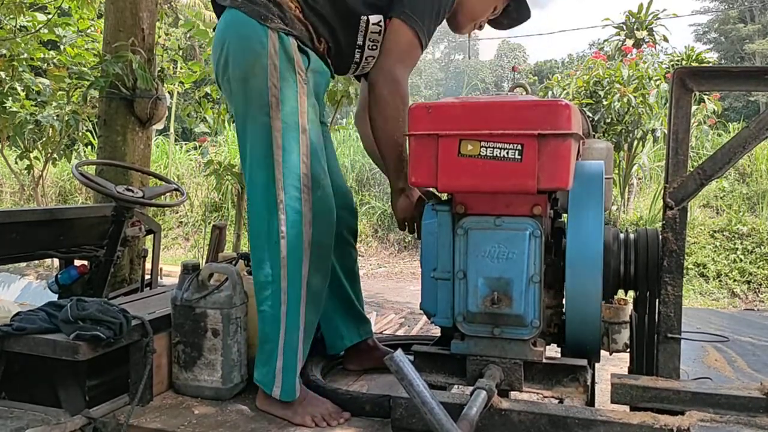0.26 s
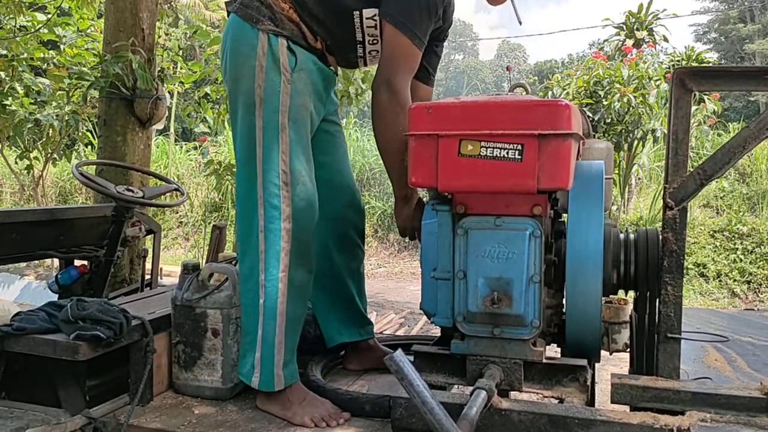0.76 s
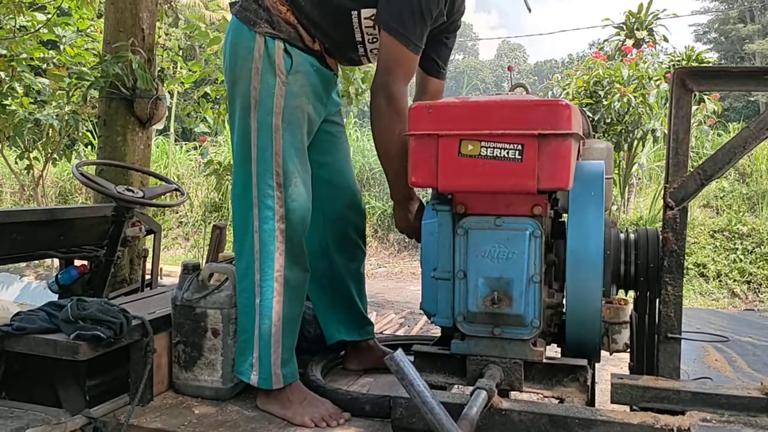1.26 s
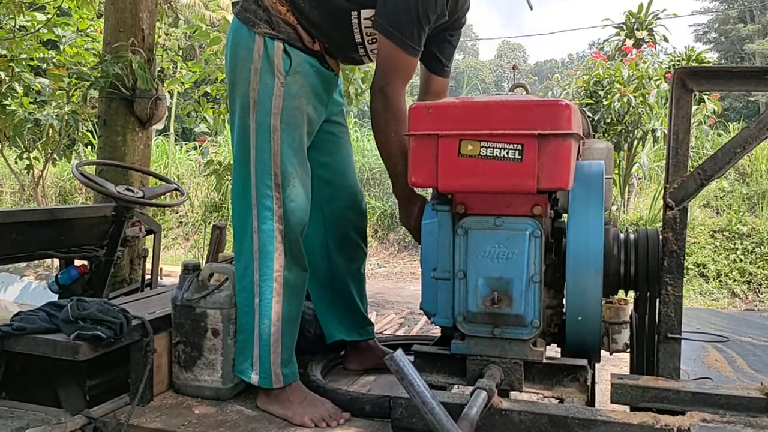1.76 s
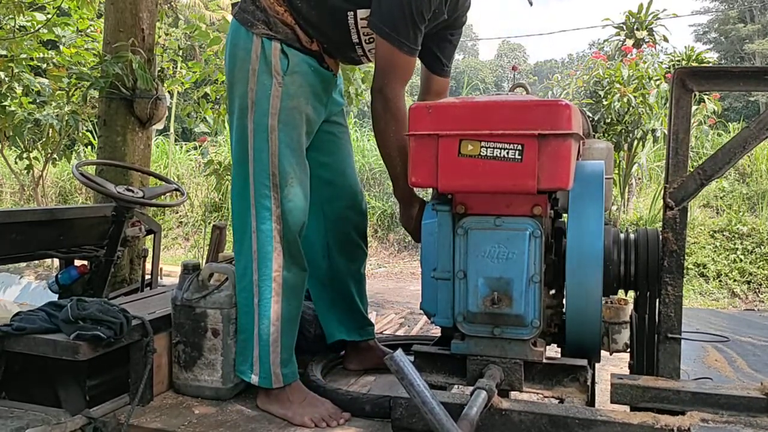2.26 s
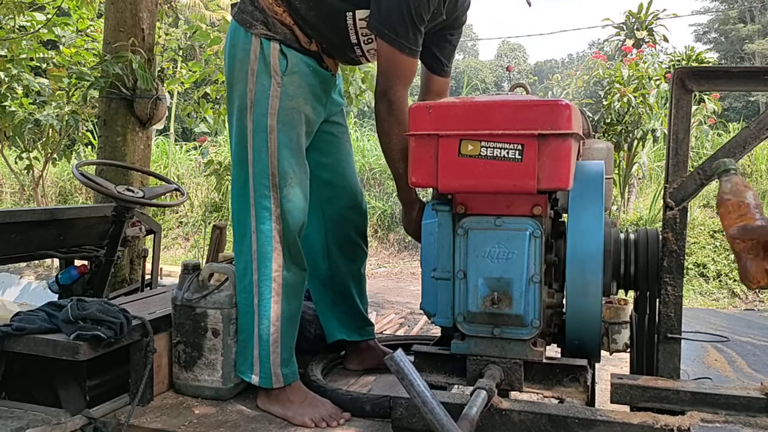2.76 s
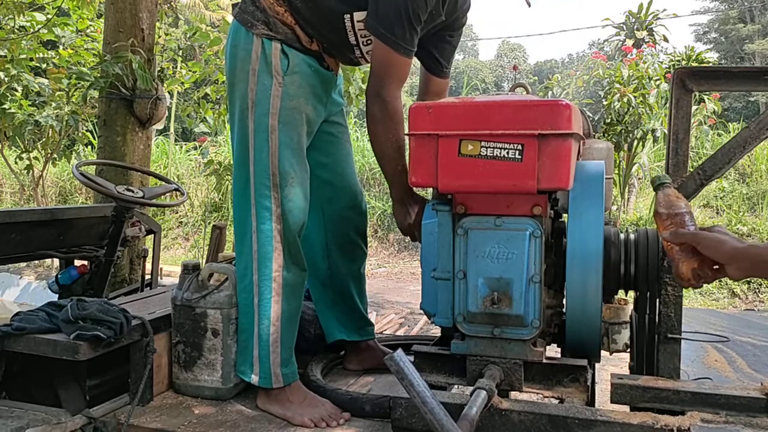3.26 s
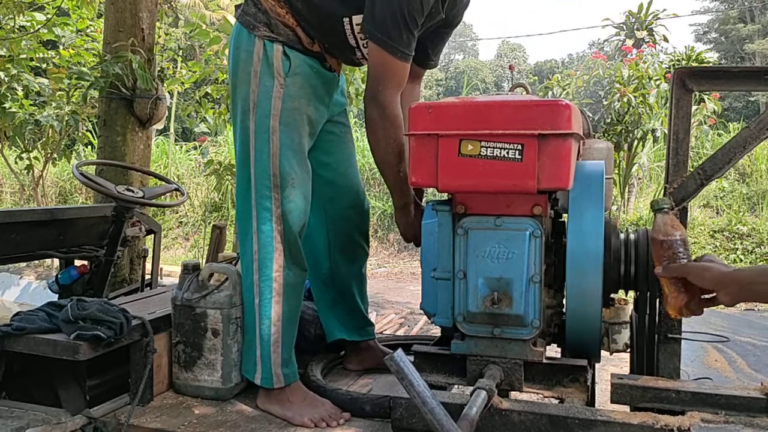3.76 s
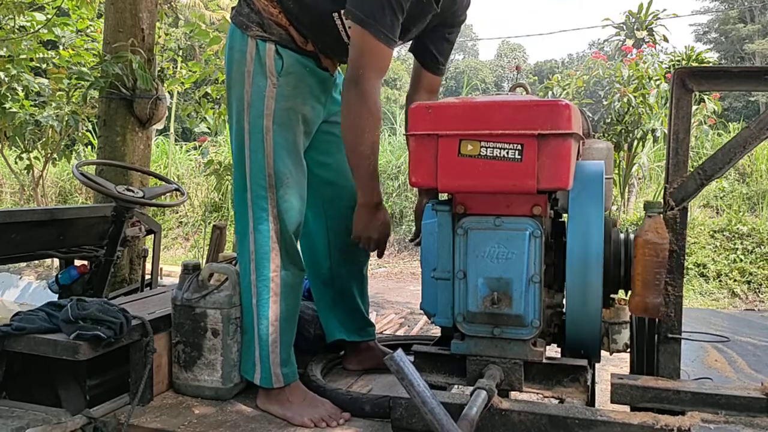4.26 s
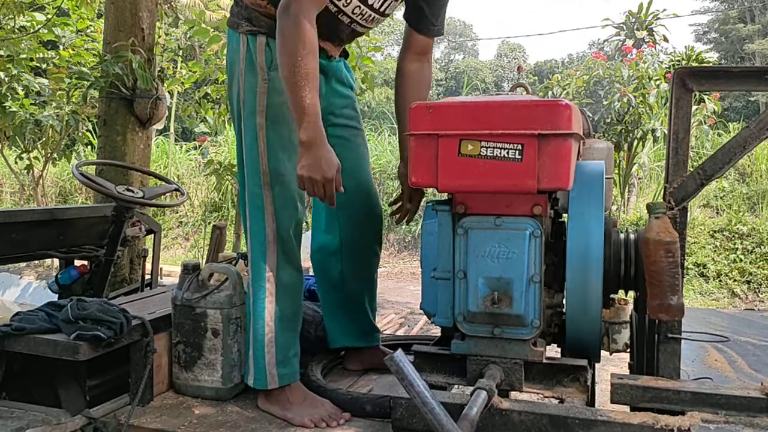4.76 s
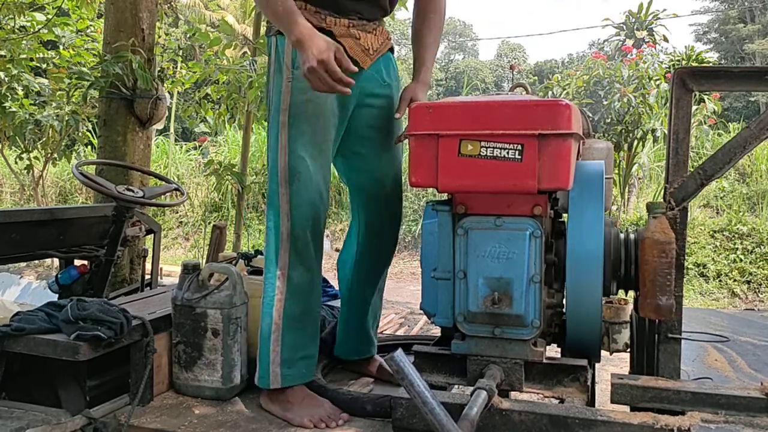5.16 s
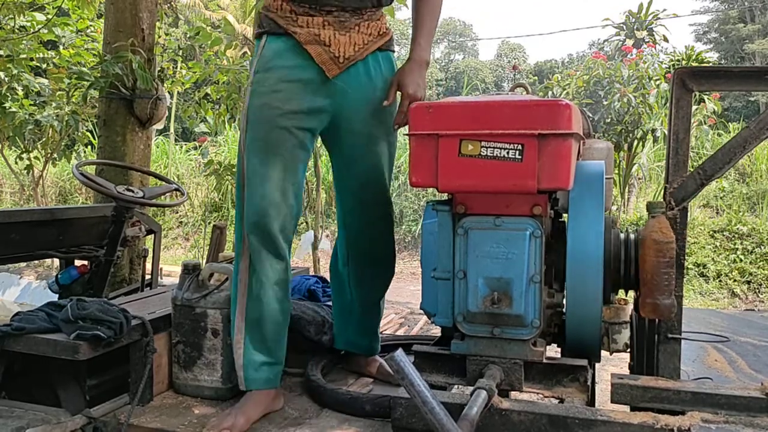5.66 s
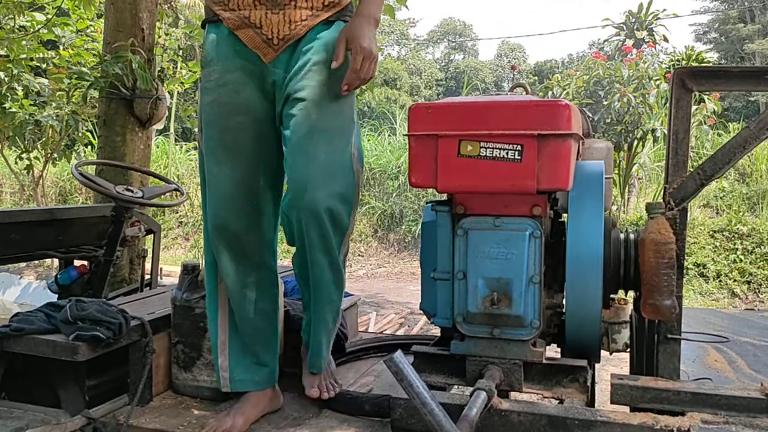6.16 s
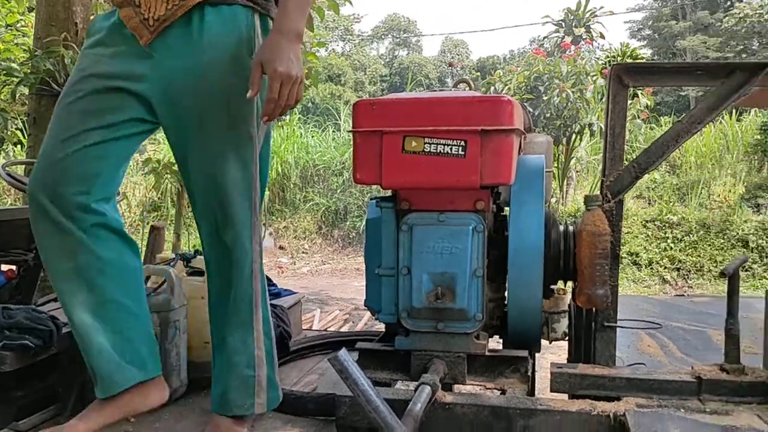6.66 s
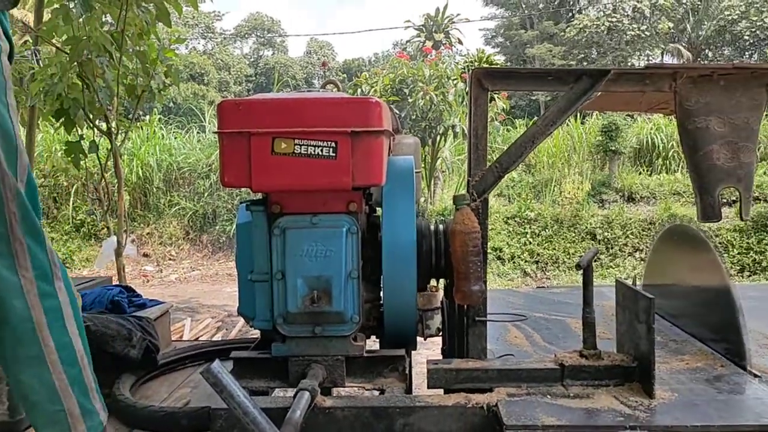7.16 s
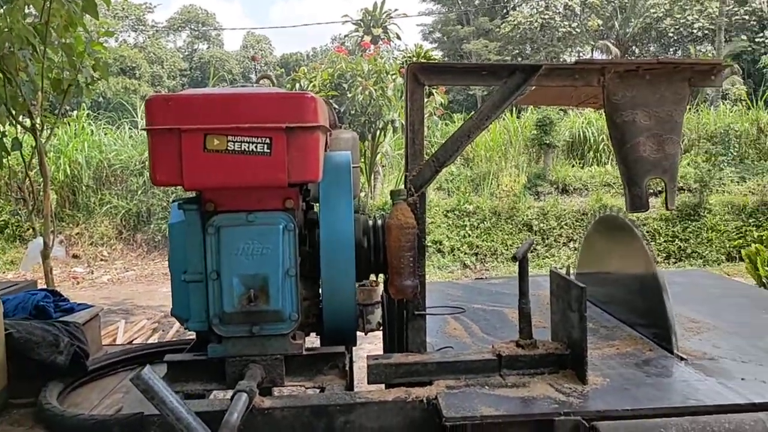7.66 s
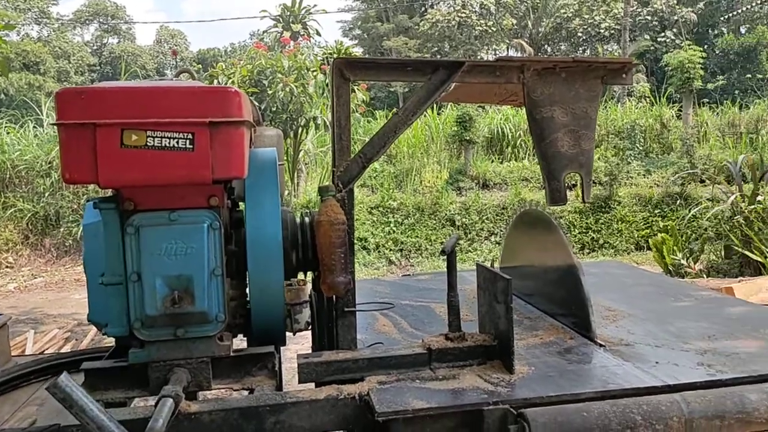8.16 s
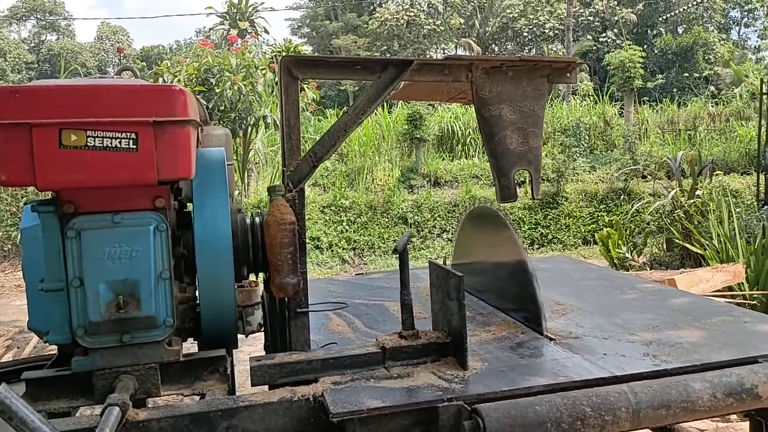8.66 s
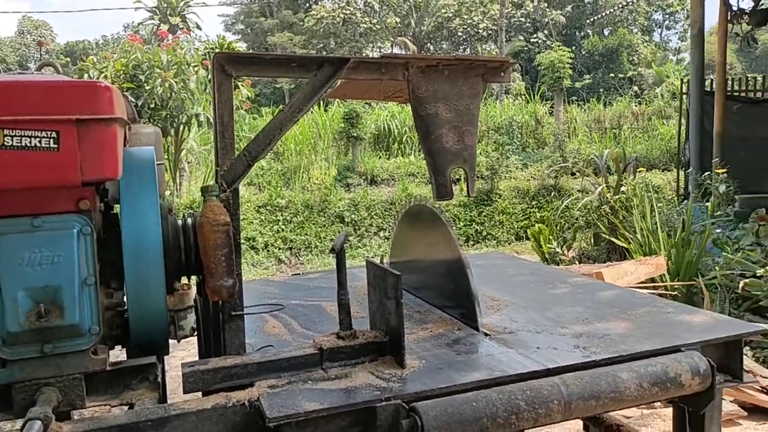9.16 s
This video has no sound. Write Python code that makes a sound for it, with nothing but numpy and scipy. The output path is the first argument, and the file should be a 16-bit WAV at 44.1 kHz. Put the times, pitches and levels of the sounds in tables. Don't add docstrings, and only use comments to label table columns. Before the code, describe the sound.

Outdoors and close, with little reverberation, a single-cylinder diesel is already running at about eleven firings per second. Low, short exhaust thumps carry hard metallic knocks that grow stronger from 0.3 s and peak near 1 s as the throttle opens. Between 1 and 1.7 s the beat quickens to nearly fourteen per second, with a brief whip of belt hiss; knocking softens around 1.6 to 2 s, then exhaust thumps fuller from 2.2 s. The rest is a steady rapid chug at about fourteen, with occasional harder knocks. Throughout, loose sheet metal buzzes brightly around 3 to 5 kHz, swelling irregularly, leaning right, over ticking valves and wide gear and belt clatter. From about 6.7 s the stereo microphone turns: rattle duller and drifting left, thin hum and clatter stronger. After 8.2 s the bass thins slightly; the engine continues to the end at 9.4 s.

```python
import sys
import numpy as np
from scipy import signal
from scipy.fft import dct
from scipy.io import wavfile
from scipy.ndimage import uniform_filter1d, map_coordinates

SR = 44100
rng = np.random.default_rng(int(sys.argv[2]) if len(sys.argv) > 2 else 0)


def to_wav(s):
    ch = np.atleast_2d(s).T
    pcm = np.round(np.clip(ch, -1, 1) * 32767)
    wavfile.write(sys.argv[1], SR, pcm.astype(np.int16))


def level_to_linear(level):
    exponent = np.asarray(level, float) / 20
    return 10 ** exponent


N = 414981

# t/s, speed/(cycles per s)
SPEED = [(-0.1, 11.458), (0.5, 11.381), (0.95, 11.517), (1.1, 12.24), (1.25, 13.018), (1.45, 13.359),
         (1.7, 13.66), (2.1, 13.672), (2.7, 13.762), (3.4, 13.93), (4.1, 13.959), (4.9, 14.03),
         (5.7, 14.055), (6.5, 14.053), (7.4, 14.06), (8.3, 14.038), (9.6, 14.046)]
# t/s, exhaust level/dB, knock level/dB
EFFORT = [(0, -26, -50), (.45, -30, -50), (.8, -25.5, -50), (.97, -31.5, -50), (1.3, -37, -50),
          (1.55, -30.5, -40), (1.85, -31, -42), (2.12, -30.5, -33), (2.27, -27, -21), (3.1, -27, -23),
          (4.1, -25.5, -22), (5.5, -27, -22), (7.0, -30, -25), (7.7, -28.5, -40), (8.1, -25.5, -25),
          (9.41, -26.5, -35)]
VALVE_PULSES = [
    (-0.003, 1.002),
    (0.261, 0.776),
    (0.686, -0.231),
    (0.888, -0.083),
    (0.424, -0.106),
    (0.118, 0.132),
]
# f/Hz, height/1, t60/s
PIPE_MODES = [(27.8, 0.003, 0.16), (71.0, 0.0019, 0.16), (94.4, -0.0021, 0.16), (112.7, -0.0005, 0.16),
              (322.9, -0.0076, 0.03), (352.2, 0.0041, 0.088), (178.1, 0.0048, 0.04),
              (176.0, -0.0025, 0.151), (230.1, -0.0067, 0.054), (409.0, 0.0007, 0.062),
              (469.9, 0.0005, 0.16), (583.3, -0.002, 0.056), (607.9, 0.0021, 0.073), (930.8, 0.0015, 0.023)]
# delay/s, relative pressure/1
REFLECTIONS = [(0.0084, -0.3225), (0.0075, 0.4533), (0.0218, -0.1101)]
# f/Hz, level/dB, t60/s
BLOCK_MODES = [(745, -0.5, 0.064), (791, -1, 0.083), (891, -2, 0.13), (917, 9.5, 0.05), (990, -12, 0.023),
               (1080, -16, 0.024), (1210, -9.5, 0.06), (1770, 1, 0.15), (1960, 0, 0.037),
               (2170, 3.5, 0.038), (2423, 11, 0.012), (2666, 5, 0.032)]
# t/s, peak level/dB, upper-mode level/dB
HARD_KNOCKS = [(0.168, -15, -16), (0.255, -32, -6), (0.343, -14.5, -11), (0.431, -19, -12),
               (0.517, -14.5, -15), (0.606, -13, -14), (0.693, -12.5, -8), (0.781, -11, -13),
               (0.868, -10.5, -7), (0.955, -4.5, -9.5), (1.04, -7, -11), (1.122, -7, -17),
               (1.202, -8.5, -5.5), (1.279, -8.5, -10), (1.355, -10.5, -5), (1.431, -11, -10),
               (1.505, -10.5, -8), (1.579, -15, -25), (1.652, -17, -17), (1.725, -17, -21),
               (1.946, -20, -19), (2.165, -15, -11), (2.238, -13, -14), (2.383, -12.5, -18),
               (2.53, -21, -16), (2.675, -13.5, -11), (2.82, -16, -15), (3.109, -13, -17),
               (3.182, -14, -11), (3.326, -19, -15), (3.756, -17, -4), (4.041, -16, -12),
               (4.329, -15.5, -7), (5.54, -22, -6), (5.969, -13, -13), (7.107, -11.5, -20),
               (7.889, -19, -10), (8.673, -12.5, -16), (9.1, -18.5, -11), (9.171, -20, -10),
               (9.313, -22, -13)]
# delay/s, level/dB
PISTON_SLAPS = [
    (.0025, -3),
    (.0051, -3.5),
    (.0088, -7),
]
# share of cycle/1, level/dB
SEATINGS = [(.002, -30), (.07, -20.5), (.17, -29), (.28, -29), (.51, -27), (.55, -26.5), (.68, -28),
            (.76, -33.5), (0.879, -30.5)]
# f/Hz, level/dB, t60/s
COVER_MODES = [(995, -0.5, 0.016), (1205, -3, 0.033), (1496, -8, 0.011), (1880, 3.5, 0.0083),
               (2330, -1.5, 0.004), (2690, -1, 0.0059)]
# f/Hz, width/Hz, level/dB
SHEET_MODES = [(3119, 28, -2.5), (3342, 24, 3), (3497, 34, 5.5), (3650, 85, 0), (3760, 40, -1),
               (3856, 55, 6), (3920, 40, 0.5), (4060, 60, 4.5), (4220, 70, 7.5), (4383, 40, 6.5),
               (4480, 66, 3), (4620, 67, 4), (4800, 55, 3), (6150, 500, -17)]
# middle t/s, length/s, rise/dB
SHEET_SWELLS = [(.05, 0.041, 3.5), (.3, 0.64, 4), (.52, 0.059, 2.5), (.9, 0.51, 4), (1.4, 1, 0.5),
                (1.84, 0.49, 6), (2.25, 0.36, 1.5), (2.55, 0.57, 2.5), (2.95, 0.61, 3.5), (3.38, 0.16, 0.5),
                (3.8, 0.083, 3.5), (4.45, 1, 2), (4.9, 0.26, 4.5), (5.13, 0.15, 3), (5.32, 0.33, 1),
                (5.48, 0.14, 1), (5.63, 0.16, 1.5), (5.78, 0.1, 5.5), (6.25, 1, 2), (6.74, 0.11, 5.5),
                (6.96, .3, 4), (7.17, 0.22, 4.5), (7.49, 0.34, 2), (7.72, 0.13, 3), (8.14, 0.082, 7.5),
                (8.25, 0.11, 4), (8.36, 0.12, 5), (8.46, 0.17, 4.5), (8.68, 0.66, 3.5), (9.36, 0.54, 1.5)]
# f/Hz, density level/dB
CLATTER_COLOUR = [(40, -7.5), (150, 6.5), (330, -3), (470, -1), (700, 0.5), (900, 0.5), (2600, 1),
                  (4500, -4.5), (5300, -12), (6500, -15), (8400, -21.5), (10500, -19.5), (13000, -34),
                  (15500, -31)]
# f/Hz, likeness/1
LIKENESS = [(60, 1), (130, 0.99), (290, 1), (640, 0.79), (1410, 0.053), (3100, 0.022), (15000, 0.053)]
STROKES = [
    (0.139, 2.3),
    (.27, 0.28),
    (.47, 0.2),
    (0.642, 0.43),
    (.955, 3.4),
]
# middle t/s, length/s, rise/dB
BELT_WHIPS = [
    (.1, 0.42, 2),
    (1.15, 0.55, 6),
    (1.8, 0.25, 2),
    (4.75, 0.2, 2),
    (7.1, 0.29, -0.5),
    (8.3, 0.96, 2),
    (9.15, 0.31, 0.5),
]
# t/s, share of turn/1
MIC_TURN = [
    (0, 0.038),
    (6.65, 0.055),
    (6.95, 0.23),
    (7.6, 0.4),
    (8.3, 0.7),
    (9.1, 0.78),
    (9.41, 0.87),
]
# f/Hz, threshold against local level/dB
PATCH_THRESHOLD = [(300, -34), (1000, -21), (1600, -18), (3900, -24), (4600, -22), (5100, -4), (6300, -4),
                   (7600, -.5), (9000, 1.5), (10300, 0), (12000, 2.5), (15000, 3)]

CYCLES_AT_START, KNOCK_SHARE = -.4437, .446
THUMP_DB, THUMP_FOLLOWS, IDLE_THUMP_DB = -35.5, 0.4, -3.5
PUFF_DB, PUFF_HZ = -5, 59
HUM_DB, HUM_TURN_DB, IDLE_HUM_DB = -45.5, 8.5, -6
RATTLE_DB, RATTLE_WANDER_DB, SHEET_DULLS_DB_PER_OCTAVE = -28.5, 0.23, 9
CLATTER_DB, CLATTER_TURN_DB, TOP_TURN_DB = -29, 3.5, -1.5
SHEET_LAG_S, ENGINE_LAG_S = 0.0003, .00007
SHEET_PAN_DB, PAN_SWING_DB = -2.5, 6.5
SHEET_ECHO_S, SHEET_ECHO_DB = .0031, -10
WIND_FILTER_S = 8.19


def rms_one(x):
    return x / np.sqrt(np.mean(x ** 2) + 1e-20)


def in_time(rows):
    s, *columns = np.transpose(rows)
    return [np.interp(np.arange(N) / SR, s, c) for c in columns]


def at_hz(points, hz):
    f, value = np.array(points)[:, :2].T
    return np.interp(np.log(hz), np.log(f), value)


def swells(rows):
    t = np.arange(0, N + 32, 32) / SR
    bumps = 0
    for middle_s, length_s, rise in rows:
        phase = np.pi * np.clip((t - middle_s) / max(length_s, .02), -.5, .5)
        bumps = bumps + rise * np.cos(phase) ** 2
    return np.interp(np.arange(N) / SR, t, bumps)


def drift(rate_hz):
    r = np.exp(-80 * np.pi * rate_hz / SR)
    noise = rng.standard_normal(N // 40 + 2002)
    slow = signal.lfilter([1], [1, -2 * r, r * r], noise)[2000:]
    return np.interp(np.arange(N) / 40, np.arange(len(slow)), rms_one(slow))


def ring(clicks, hz, t60_s):
    r, w = level_to_linear(-60 / (t60_s * SR)), 2 * np.pi * hz / SR
    return signal.lfilter([0, np.sin(w)], [1, -2 * r * np.cos(w), r * r], clicks + 1e-18)


def resonate(x, hz, width_hz):
    r, w = np.exp(-np.pi * width_hz / SR), 2 * np.pi * hz / SR
    return signal.lfilter(np.array([1, 0, -1]) * (1 - r * r) / 2, [1, -2 * r * np.cos(w), r * r], x)


def resonate_twice(x, hz, width_hz):
    return resonate(resonate(x, hz, width_hz), hz, width_hz)


def butter(x, order, hz, kind="low"):
    return signal.sosfilt(signal.butter(order, hz, kind, fs=SR, output="sos"), x)


def delayed(x, lag_s):
    return np.pad(x, (round(lag_s * SR), 0))[:N]


def each_cycle(share, spread_db):
    cycles = CYCLES_AT_START + np.cumsum(in_time(SPEED)[0]) / SR - share
    at = np.flatnonzero(np.diff(np.floor(cycles)))
    clicks = np.zeros(N)
    clicks[at] = level_to_linear(rng.normal(0, 1, len(at)) * spread_db)
    return clicks


def mic_pair(x, lag_s, pan_db):
    left = map_coordinates(x, [np.arange(N) - lag_s * SR], order=3, mode="nearest")
    return np.array([left * level_to_linear(pan_db / 2), x * level_to_linear(-pan_db / 2)])


def exhaust(thump_db, bark_db, idle):
    pulses = sum(pressure * each_cycle(share, spread_db=0.4) for share, pressure in VALVE_PULSES)
    pipe = sum(height * ring(pulses, hz, t60_s) for hz, height, t60_s in PIPE_MODES)
    pipe = pipe + sum(pressure * delayed(pipe, lag_s) for lag_s, pressure in REFLECTIONS)
    lows = butter(pipe, 1, 120)
    puff = level_to_linear(PUFF_DB) * (1 - idle) * butter(pipe, 1, PUFF_HZ)
    return level_to_linear(thump_db + 63.0) * (lows + puff) + level_to_linear(bark_db + 55.0) * (pipe - lows)


def knock(knock_db):
    s, peak_db, upper_db = np.transpose(HARD_KNOCKS)
    at = (s * SR).astype(int)
    listed = np.zeros(N)
    listed[at] = 1
    unlisted = uniform_filter1d(listed, size=1501) < 1e-6
    usual = each_cycle(KNOCK_SHARE, spread_db=2.5) * level_to_linear(knock_db) * unlisted
    chance = rng.standard_normal((len(at), len(BLOCK_MODES)))
    blow = 0
    for k, (hz, db, t60_s) in enumerate(BLOCK_MODES):
        upper = hz > 1500
        clicks = usual.copy()
        clicks[at] = level_to_linear(peak_db + upper * (upper_db + 5.0) + 1.6 * chance[:, k])
        sign = (-1) ** (k * upper)
        blow = blow + sign * level_to_linear(db - 16.5) * ring(clicks, hz, t60_s)
    blow = blow + sum(level_to_linear(db) * delayed(blow, lag_s) for lag_s, db in PISTON_SLAPS)
    blow = butter(blow, 4, 680, "high")
    between_blows = resonate_twice(rng.standard_normal(N), hz=775, width_hz=530)
    return blow + level_to_linear(-40.5) * rms_one(between_blows)


def gear_hum(hum_db):
    tone = np.sqrt(2) * np.sin(2 * np.pi * np.cumsum(576 + 1.8 * drift(3)) / SR)
    block = rms_one(resonate_twice(rng.standard_normal(N), hz=800.0, width_hz=29.0))
    return level_to_linear(hum_db - 1.0 + 2.4 * drift(16)) * tone + level_to_linear(-42.5) * block


def seatings(turn):
    ticks = sum(level_to_linear(db) * each_cycle(share, spread_db=2.5) for share, db in SEATINGS)
    rings = 0
    for hz, db, t60_s in COVER_MODES:
        rings = rings + level_to_linear(db) * ring(ticks * rng.uniform(-0.82, 1, N), hz, t60_s)
    return level_to_linear(-0.5 + 1.5 * turn) * rings


def rattle(taps_per_s, turn):
    sizes = level_to_linear(1.2 * np.minimum(rng.exponential(1, N), 5))
    taps = sizes * (rng.random(N) < taps_per_s * level_to_linear(3.0 * drift(60)) / SR)
    signs = rng.choice([-1., 1.], (2, N))
    rings = level_to_linear(-2.0) * resonate(taps * signs[0], hz=4760, width_hz=4100.0)
    rings = butter(rings, 6, 4800)
    for k, (hz, width_hz, db) in enumerate(SHEET_MODES):
        dull_db = SHEET_DULLS_DB_PER_OCTAVE * turn * np.log2(3800 / hz)
        mode = resonate_twice(taps * signs[k % 2], hz, 1.5 * width_hz)
        rings = rings + level_to_linear(db + 3 + dull_db) * mode
    level_db = RATTLE_DB + swells(SHEET_SWELLS) + RATTLE_WANDER_DB * drift(8.3) + 2.5
    return level_to_linear(level_db) * rms_one(rings)


def clatter(turn, idle, patchy_db, beat_db):
    level_db = CLATTER_DB + CLATTER_TURN_DB * turn - 0.5 * idle
    top_db = TOP_TURN_DB * turn + 0.51 * idle - 7.5 + swells(BELT_WHIPS)
    strokes = sum(strength * each_cycle(share, spread_db=1.0) for share, strength in STROKES)
    fall = np.exp(-1 / (0.0027 * SR))
    beat = beat_db * rms_one(signal.lfilter([1], [1, -fall], strokes))
    lean_db = np.array([[-1.3], [1.3]])
    together = drift(6)
    edges_hz = 22 * 2 ** np.arange(0, 9.9, .4)
    white = rng.standard_normal((2, 2, N))
    out = 0
    for k, (low, high) in enumerate(zip(edges_hz, edges_hz[1:])):
        mid, side = butter(white[k % 2], 3, [low, high], "band")
        hz = np.sqrt(low * high)
        alike = np.clip(at_hz(LIKENESS, hz), -1, 1)
        flicker_db = patchy_db * (drift(25.3) + 0.28 * together)
        stroke_db = beat * (1.4 + 0.97 * (900 < hz < 3500))
        bright_db = (hz > 5000) * (top_db + 0.38 * drift(6.9) + lean_db)
        gain = level_to_linear(at_hz(CLATTER_COLOUR, hz) + flicker_db + stroke_db + bright_db)
        out = out + gain * (np.sqrt(1 + alike) * mid + np.sqrt(1 - alike) * side * [[1], [-1]])
    return level_to_linear(level_db + 4) * rms_one(out)


def scene():
    bark_db, knock_db = in_time(EFFORT)
    speed = in_time(SPEED)[0]
    turn = np.clip(in_time(MIC_TURN)[0], 0, 1)
    idle = (speed.max() - speed) / np.ptp(speed)
    thump_db = THUMP_DB + THUMP_FOLLOWS * (bark_db - bark_db.mean()) + IDLE_THUMP_DB * idle
    hum_db = HUM_DB + HUM_TURN_DB * turn + IDLE_HUM_DB * idle
    pipe = mic_pair(exhaust(thump_db, bark_db, idle), ENGINE_LAG_S, pan_db=0)
    block = mic_pair(knock(knock_db) + gear_hum(hum_db) + seatings(turn), ENGINE_LAG_S, pan_db=1.0)
    sheet_pan_db = SHEET_PAN_DB + PAN_SWING_DB * turn
    sheet = mic_pair(rattle(taps_per_s=4000, turn=turn), SHEET_LAG_S * (1 - turn), sheet_pan_db)
    echo = np.roll(sheet, round(SHEET_ECHO_S * SR), axis=1) * [[1], [-1]]
    sheet = sheet + level_to_linear(SHEET_ECHO_DB) * echo
    return pipe + block + sheet + clatter(turn, idle, patchy_db=2.5, beat_db=-0.52)


def patchy_bands(x, start=253, band_hz=350, wander_db=4, top_hz=15250):
    pads = (1024 - start, 2048 + (start - N) % 1024)
    pair = np.pad([x[0] + x[1], x[0] - x[1]], ((0, 0), pads))
    window = np.kaiser(1025, 4 * np.pi)
    slope = np.sqrt(np.cumsum(window)[:-1] / window.sum())
    halves = pair.reshape(2, -1, 1024)
    a, b = np.split(halves[:, :-1] * slope, 2, axis=2)
    c, d = np.split(halves[:, 1:] * slope[::-1], 2, axis=2)
    folded = np.concatenate([-c[..., ::-1] - d, a - b[..., ::-1]], axis=2)
    lines = dct(folded, type=4, norm="ortho")
    hz = (np.arange(1024) + .5) * SR / 2048
    local = np.sqrt(uniform_filter1d(np.mean(lines ** 2, axis=0), size=31, axis=1) + 1e-20)
    jumps = rng.standard_normal((lines.shape[1], 200))[:, (hz / band_hz).astype(int)]
    limit_db = at_hz(PATCH_THRESHOLD, hz) + wander_db * jumps + 15 * (hz > top_hz)
    step = level_to_linear(limit_db) * local / .6
    kept = np.sign(lines) * np.floor(np.abs(lines) / step + .4) * step
    u, v = np.split(dct(kept, type=4, norm="ortho"), 2, axis=2)
    rising = np.concatenate([v, -v[..., ::-1]], axis=2) * slope
    falling = np.concatenate([-u[..., ::-1], -u], axis=2) * slope[::-1]
    body = (rising[:, 1:] + falling[:, :-1]).reshape(2, -1)
    lead = pair[:, 1024 - start:1024]
    mid, side = np.concatenate([lead, body], axis=1)[:, :N]
    return np.array([mid + side, mid - side]) / 2


def low_pass(x):
    return signal.sosfilt(signal.butter(12, 15630, fs=SR, output="sos"), x)


def record(dry):
    x = butter(dry, 3, 19, "high")
    thinned = butter(x, 2, 105, "high")
    share = 0.4 * np.clip((np.arange(N) / SR - WIND_FILTER_S) / 0.024, 0, 1)
    mix = patchy_bands(x + share * (thinned - x))
    return low_pass(mix)


dry = scene()
out = record(dry)
to_wav(out)
```